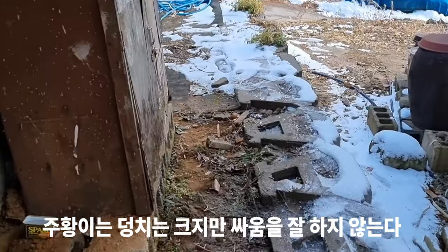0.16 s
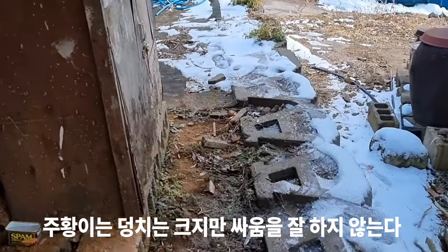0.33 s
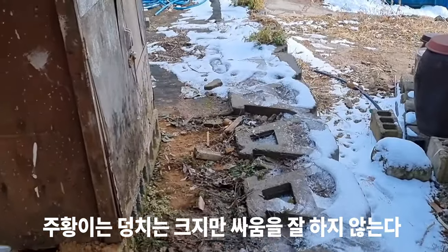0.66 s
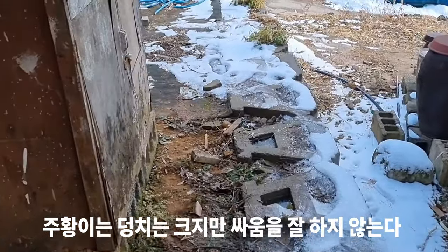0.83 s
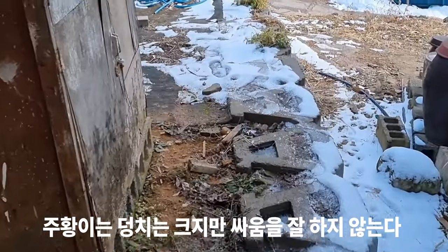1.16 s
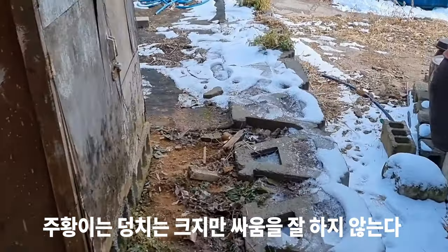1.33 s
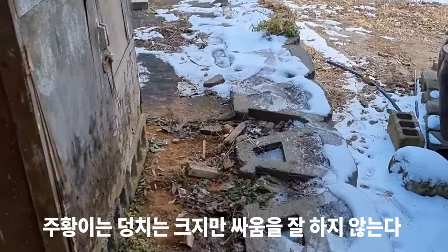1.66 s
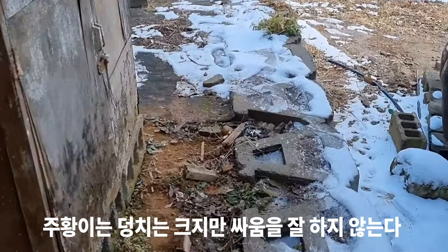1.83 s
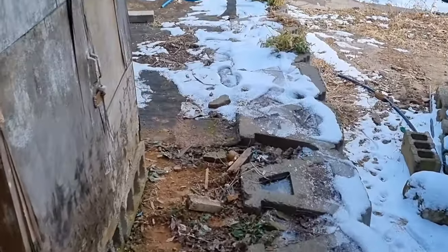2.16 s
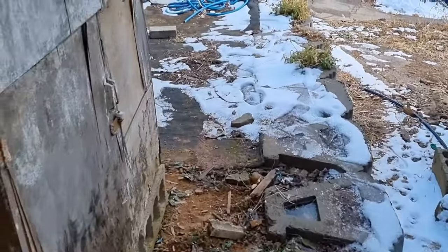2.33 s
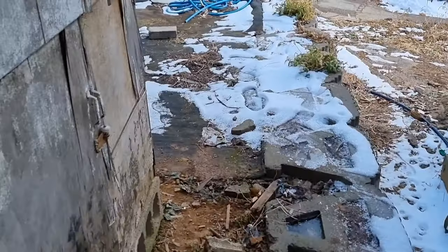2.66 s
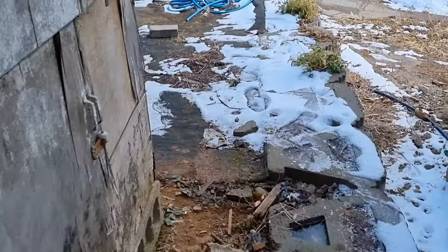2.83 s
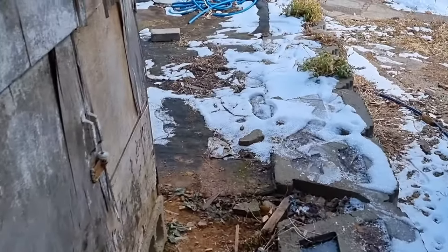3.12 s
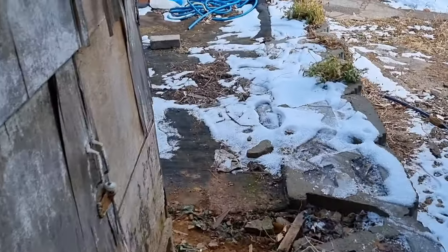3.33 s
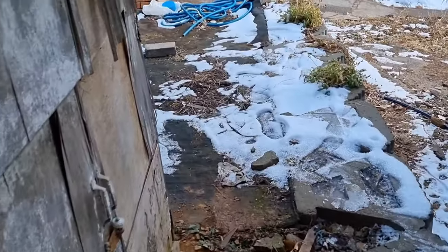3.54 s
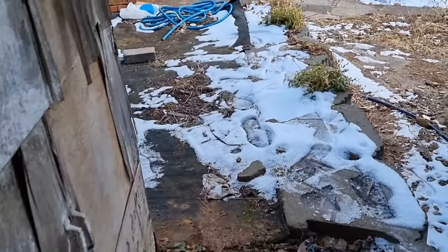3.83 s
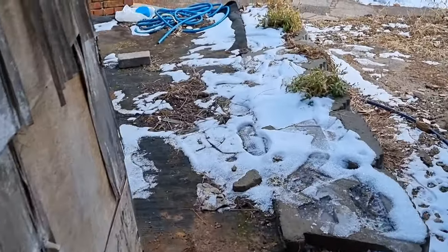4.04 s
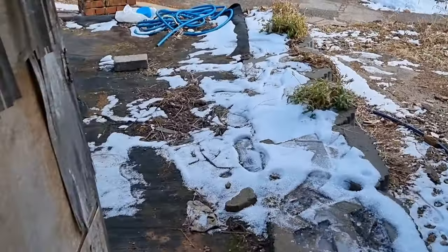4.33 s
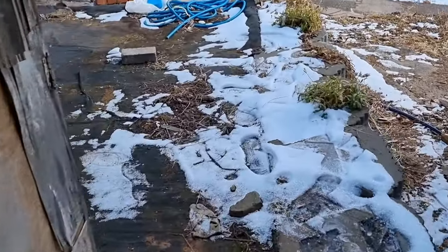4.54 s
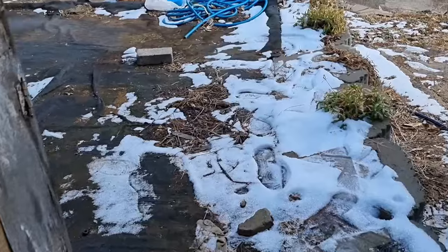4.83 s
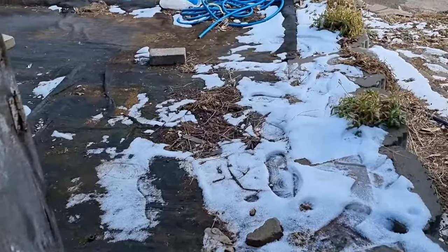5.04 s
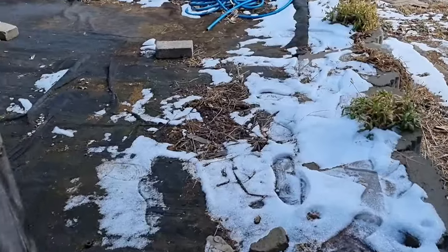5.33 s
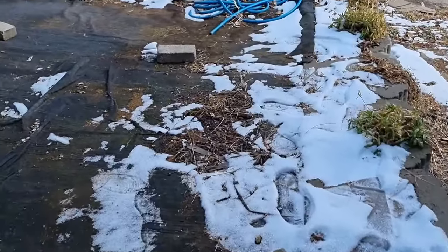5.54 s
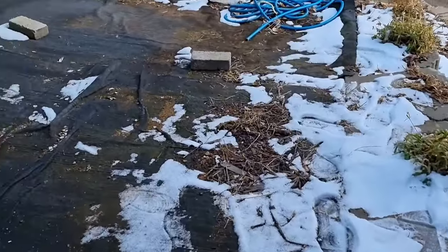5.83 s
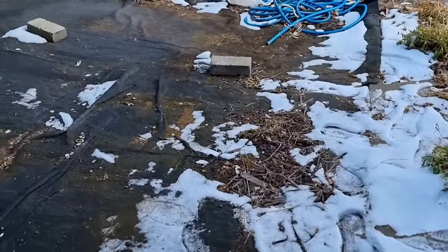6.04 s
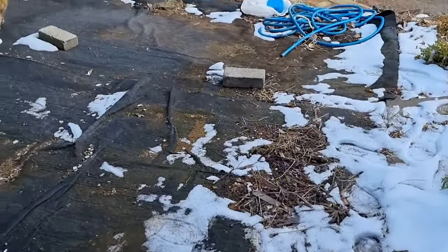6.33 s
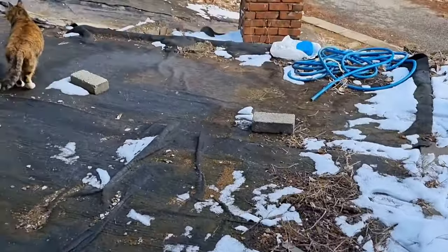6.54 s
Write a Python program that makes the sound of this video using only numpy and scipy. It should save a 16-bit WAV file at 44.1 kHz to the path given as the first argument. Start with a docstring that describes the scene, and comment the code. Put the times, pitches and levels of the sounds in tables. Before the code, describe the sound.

Someone treads carefully on icy ground beside a shed, crust crumbling and snapping in bursts over soft air noise and low rumble.

```python
"""Slow, uneven steps over crusted snow and frozen litter beside a shed, heard by a hand-held phone.
From the start, filtered-noise air and rumble, a two-partial mains hum and a narrow noise drone lie beneath.
Weight crumbles the crust at once: enveloped noise makes grains, damped sines make ringing flakes.
Noise bursts through ground resonances thud; plate resonators crack in snaps, one strong near 1.4 s,
then in clusters near 2.2 s and 4.8 s. A decaying-noise echo follows, and a last thud falls near 6.6 s."""
import sys
import numpy as np
from scipy import signal
from scipy.fft import rfft, irfft, next_fast_len
from scipy.io import wavfile
from scipy.ndimage import uniform_filter1d, map_coordinates

SR = 44100
rng = np.random.default_rng(int(sys.argv[2]) if len(sys.argv) > 2 else 0)


def int16_out(signal):
    """Quantize to a 16-bit WAV file."""
    q = np.round(np.clip(np.atleast_2d(signal).T, -1, 1) * 32767)
    wavfile.write(sys.argv[1], SR, q.astype(np.int16))


N = 294534

# left-right likeness of diffuse air and echo: f/Hz, likeness
AIR_LIKENESS = [(60, 0.57), (240, 0.77), (950, -0.03), (3770, 0.47), (15000, -0.28)]
# loose grains trickling, before layer trims: t/s, crumble level/dB, low rustle level/dB, ice fizz level/dB
TRICKLE_LEVELS = [(0.0, -64.5, -69, -62), (0.43, -51, -73, -60.5), (0.78, -65, -68.5, -66),
                  (1.47, -59.5, -60.5, -63.5), (1.92, -67.5, -69, -69.5), (2.21, -63.5, -66, -67.5),
                  (2.34, -53, -64, -61), (2.64, -63.5, -69, -65), (3.44, -55, -72, -64),
                  (3.64, -66, -66, -71), (4.04, -69.5, -65, -72), (4.58, -61.5, -71, -73),
                  (4.74, -53, -63, -52.5), (5.04, -66, -69, -68), (5.67, -65.5, -62.5, -66),
                  (5.86, -56, -61, -61), (6.12, -70.5, -65.5, -69), (6.68, -68, -82, -66.5)]
# sole meeting hard ground, before layer trims: t/s, hold/s, level/dB, low bump level above it/dB, bump f/Hz
SOLE_THUDS = [(0.037, 0.012, -42, -15, 243), (0.421, 0.0063, -56.5, 3.5, 250),
              (1.187, 0.043, -45.5, -3, 162), (2.181, 0.035, -48.5, -6, 197), (2.235, 0.0071, -42, -2, 208),
              (2.262, 0.0085, -36.5, -0.5, 209), (3.602, 0.0042, -49, 2.5, 416),
              (4.152, .05, -36, -9.5, 290), (5.4, 0.013, -43.5, -2, 218), (5.457, 0.011, -43.5, 3.5, 260),
              (5.481, 0.018, -41.5, -2, 191), (6.637, 0.01, -48, -4.5, 178)]
THUD_RISE_S, THUD_RELEASE_S = 0.0032, 0.052  # release is the time to fall 60 dB
LOOSE_HZ = 1494  # central pitch of loose shards


def amp(db):
    """Logarithmic level: the amplitude ratio of a level in dB."""
    return 10 ** (np.asarray(db) / 20)


def unit(x):
    """Mean-square normalization: scales a signal to rms 1."""
    return x / np.sqrt(np.mean(x ** 2) + 1e-20)


def along(points, hz):
    """Logarithmic frequency scale: interpolates (f/Hz, value) points."""
    f, v = np.transpose(points)
    return np.interp(np.log(hz + 1), np.log(f + 1), v)


def curves(rows):
    """Linear interpolation in time: one value per sample for each column after t/s."""
    s, *cols = np.transpose(rows)
    return [np.interp(np.arange(N) / SR, np.maximum.accumulate(s), c) for c in cols]


def wobble(rate):
    """Slow random modulation: a smooth curve through rate random knots a second."""
    knots = rng.standard_normal(int(N * rate / SR) + 4)
    return map_coordinates(knots, [np.arange(N) * rate / SR])


def filtered(x, response):
    """Linear filtering: the spectrum is multiplied by a complex response of frequency."""
    m = next_fast_len(N + 8192)
    return irfft(rfft(x, m) * response(np.fft.rfftfreq(m, 1 / SR)), m)[..., :N]


def causal(points):
    """Minimum phase by cepstral folding: a response of (f/Hz, level/dB) points, with energy 1."""
    def response(hz):
        ceps = irfft(np.log(amp(np.maximum(along(points, hz), -70))))
        half = len(ceps) // 2
        ceps[1:half] *= 2
        ceps[half + 1:] = 0
        gain = np.exp(rfft(ceps))
        return gain / np.sqrt(np.mean(abs(gain) ** 2))
    return response


def resonances(modes, hz):
    """Modal superposition: damped (f/Hz, width/Hz, level/dB) modes of alternating sign, with energy 1."""
    gain = 0
    for k, (center, width, db) in enumerate(modes):
        damping = 1j * hz * width
        gain = gain + (-1) ** k * amp(db) * damping / (center * center - hz * hz + damping)
    return gain / np.sqrt(np.mean(abs(gain) ** 2))


def ports(pair, alike):
    """Spatial coherence: mixes two unrelated signals into left and right with the given likeness."""
    def mid_side_gains(hz):
        turn = np.arccos(np.clip(along(alike, hz), -1, 1)) / 2
        return np.sqrt(2) * np.array([np.cos(turn), np.sin(turn)])
    mid, side = filtered(pair, mid_side_gains)
    return np.array([mid + side, mid - side]) / np.sqrt(2)


def yard():
    """Stationary noise and mains harmonics: faint broad air, low rumble, and a hum that wavers."""
    # relative air spectrum: f/Hz, level/dB
    air_colour = [(47, -35), (80, 4.5), (91, -16), (217, -10), (259, -15.5), (316, -14.5), (413, -15.5),
                  (601, -12.5), (858, -17), (1200, -18), (5050, -33.5), (7050, -23.5), (11000, -32.5),
                  (12800, -22.5), (16000, -33.5)]
    # relative rumble spectrum: f/Hz, level/dB
    rumble_colour = [(15, -6.5), (28, -6), (45, -8.5), (90, -17), (140, -38.5)]
    # hum envelope, before its 3 dB lift and waver: t/s, level/dB
    hum_levels = [(0, -61.5), (2.3, -63.5), (4.4, -66), (4.7, -72.5), (6.2, -70), (6.68, -91)]
    air = filtered(rng.standard_normal((2, N)), lambda hz: amp(along(air_colour, hz)))
    air = amp(-66.5 + 1.2 * wobble(3.41)) * unit(ports(air, AIR_LIKENESS))
    rumble = filtered(rng.standard_normal((2, N)), lambda hz: amp(along(rumble_colour, hz)))
    rumble = amp(-70.5) * unit(ports(rumble, AIR_LIKENESS))
    phase = 2 * np.pi * 59.8 * np.arange(N) / SR + .9 * wobble(11)
    waver_db = 2.6 * wobble(14) + 1.5 * wobble(4)
    partials = np.sin(phase) + amp(-15.5) * np.sin(2 * phase)
    hum = amp(curves(hum_levels)[0] + 3.0 + waver_db) * partials
    return air + rumble + hum


def drone():
    """Narrow-band noise: a twice-applied resonance wavers alike at both ports and lingers after some steps."""
    # drone envelope: t/s, level/dB
    drone_levels = [(0.0, -78), (0.5, -73), (1.15, -84), (1.39, -72), (2.08, -82), (2.36, -68),
                    (2.66, -78.5), (3.44, -69.5), (4.54, -81), (4.72, -71), (5.15, -80), (5.62, -63.5),
                    (6.34, -80.5), (6.68, -81)]
    center_hz, width_hz = 314, 25  # width of one pass
    mode = [(center_hz, width_hz, 0)]
    band = filtered(rng.standard_normal(N), lambda hz: resonances(mode, hz) ** 2)
    return amp(curves(drone_levels)[0]) * unit(band)


def press(start, rise, hold, release):
    """Contact-force envelope: a rounded rise, a hold, then an exponential release."""
    t = np.arange(N) / SR - start
    rise = max(rise, .001)
    up = np.sin(np.pi / 2 * np.clip(t / rise, 0, 1)) ** 2
    return up * amp(-60 * np.maximum(t - rise - max(hold, 0), 0) / release)


def pushes():
    """Addition of powers: trickle, pushes and thuds drive each layer; power weights the shard pitch."""
    # weight crushing the crust, before layer trims: t/s, rise/s, hold/s, crumble level/dB,
    # thud level above it/dB, fizz level above it/dB, shard f/Hz
    push_rows = [(0, 0.028, 0.033, -35, -7, -5, 1800), (0.26, 0.026, 0.033, -53, -8, -1.5, 1400),
                 (0.396, 0.0035, 0.018, -44, -3, -11, 1280), (0.434, .015, 0.027, -64, -20, 2, 1410),
                 (0.832, 0.026, 0.026, -45.5, -25, -7, 1840), (1.185, 0.0067, 0.05, -41, -2, -4, 1600),
                 (1.253, 0.0092, 0.045, -42, -11.5, -6, 1700), (1.322, .012, 0.017, -49, -25, 0.5, 1610),
                 (2.174, 0.0033, 0.013, -32.5, -5.5, -1, 2000), (2.201, 0.023, 0.05, -31, -12, -9.5, 1960),
                 (2.28, .005, 0.026, -43, -7, -5, 1510), (2.38, 0.0062, 0.005, -33, -16, -10.5, 1170),
                 (2.467, .004, 0.042, -46.5, -10, -5.5, 1330), (2.522, .01, .04, -61, -15, 2.5, 2040),
                 (2.931, 0.035, 0.051, -50.5, -28, -4, 1870), (3.29, 0.029, 0.04, -54, 1, -1.5, 1220),
                 (3.409, 0.0087, 0.0075, -46.5, -4.5, -2, 2020), (3.459, 0.025, 0.089, -54, -23, 6, 2260),
                 (4.153, 0.0048, 0.042, -32, -6, -2, 1580), (4.528, 0.017, 0.029, -44.5, -31, -17, 1770),
                 (4.573, 0.0096, 0.074, -46, -20, -15, 1770), (4.673, 0.0064, 0.004, -34.5, -19, -22, 1640),
                 (4.704, .01, 0.016, -39, -20, -17, 1570), (4.746, 0.0086, 0.038, -35, -18, -12.5, 1620),
                 (4.807, 0.0046, 0.017, -44.5, -18, -12, 1440), (4.855, 0.026, 0.059, -51, -18, -5, 2090),
                 (5.367, .03, 0.083, -50.5, -14, 3, 1560), (5.425, 0.009, .05, -43, -15, 0, 2200),
                 (5.495, .01, 0.029, -64.5, -7, 15.5, 2000)]
    release_s = 0.099  # 60 dB fall once the weight stops moving
    drift = 0.26  # slow pitch drift of loose shards, in log units
    power = amp(curves(TRICKLE_LEVELS)) ** 2
    pitch = power[0] * (np.log(LOOSE_HZ) + drift * wobble(7))
    for s, rise, hold, db, thud_db, fizz_db, hz in push_rows:
        weight = (amp(db) * press(s, rise, hold, release_s)) ** 2
        power = power + weight * amp([[0], [thud_db], [fizz_db]]) ** 2
        pitch = pitch + weight * np.log(hz)
    thuds = 0
    for s, hold, db, *_ in SOLE_THUDS:
        thuds = thuds + (amp(db) * press(s, THUD_RISE_S, hold, THUD_RELEASE_S)) ** 2
    crust, thud, fizz = np.sqrt(power[0]), np.sqrt(power[1] + thuds), np.sqrt(power[2])
    return crust, thud, fizz, np.exp(pitch / power[0])


def grains(rate, spread_db, life_ms, bed):
    """Shot noise: two noises share an envelope of tiny decaying breaks at random moments, over a bed."""
    breaks = (rng.random(N) < rate / SR) * amp(spread_db * rng.exponential(size=N))
    fade = np.exp(-1000 / (life_ms * SR))
    envelope = unit(signal.lfilter([1], [1, -fade], breaks)) + bed
    return unit(envelope * rng.standard_normal((2, N)))


def shards(force, pitch, rate, spread, cycles):
    """Damped free vibration: each flake is a short ring near the shard pitch, of unrelated phases in two signals."""
    count = 4000
    draw = rng.random((count, 4))
    start = (np.cumsum(-np.log(draw[:, 0])) * SR / rate).astype(int) % N
    hz = pitch[start] * np.exp(spread * rng.standard_normal(count))
    size = force[start] * amp(2.67 * -np.log(draw[:, 1]))
    steps = np.arange(300)  # samples in one ring
    turns = np.outer(hz / SR, steps)
    fade = size[:, None] * np.exp(-turns / cycles) * np.sqrt(hz / 1500)[:, None]
    at = (start[:, None] + steps).ravel()

    def ring(phase):
        waves = fade * np.sin(2 * np.pi * (turns + phase[:, None]))
        return np.bincount(at, waves.ravel(), N + steps.size)[:N]

    return np.array([ring(draw[:, 2]), ring(draw[:, 3])])


def sounded(crust, thud, fizz):
    """Source-filter principle: forces on crust, ground and ice dust each pass through their own colour."""
    # relative crust spectrum: f/Hz, level/dB
    crust_colour = [(200, -18.5), (350, -18.5), (500, -6.5), (800, -3.5), (1500, -2.5), (2100, -3.5),
                    (2900, -4), (3400, -5.5), (3750, -20), (5000, -18.5), (7000, -51)]
    # relative ice-dust spectrum: f/Hz, level/dB
    ice_colour = [(2060, -40), (3500, -3.5), (4660, -6), (5360, -4), (6610, -4.5), (7560, -1.5),
                  (9560, -10), (11100, -8.5), (12600, -6.5), (14200, -6.5), (16000, -6)]
    # sole on frozen soil: f/Hz, width/Hz, relative level/dB
    ground_modes = [(181.5, 134, -11), (306.4, 65, 2), (418, 82, -0.5), (660, 315, -7)]
    # left-right likeness of the steps: f/Hz, likeness
    step_likeness = [(150, 0.97), (500, 0.65), (1500, 0.7), (5000, 0.058), (14000, 0.043)]
    both = filtered(crust, causal(crust_colour)) + filtered(fizz, causal(ice_colour))
    both += filtered(thud, lambda hz: resonances(ground_modes, hz))
    return ports(both, step_likeness)


def crumble():
    """Granular fracture: dense grains and ringing flakes break while weight rolls over the sole."""
    crust, thud, fizz, pitch = pushes()
    clumps = wobble(60)  # grains come in clumps that all layers share
    crust = crust * amp(1.5 * clumps)
    crust_grains = amp(-5) * crust * grains(400, spread_db=2.2, life_ms=3.2, bed=.7)
    flakes = amp(-11) * shards(crust, pitch, 600, spread=0.335, cycles=2.74)
    fizz = fizz * amp(0.32 * clumps) * grains(650, spread_db=4.0, life_ms=4.7, bed=1.0)
    thud = thud * amp(1.05 * clumps - 4.5) * grains(150, spread_db=1.5, life_ms=1.4, bed=1.3)
    return sounded(crust_grains + flakes, thud, fizz)


def bumps():
    """Resonant impact: one broad mode gives the heel's low bump under each thud, alike at both ports."""
    out = np.zeros(N)
    for s, hold, db, bump_db, hz in SOLE_THUDS:
        b, a = signal.iirpeak(hz, 1.6, SR)
        once = signal.lfilter(b, a, rng.standard_normal(N))
        body = unit(signal.lfilter(b, a, once))
        out += amp(db + bump_db) * press(s, THUD_RISE_S, hold, THUD_RELEASE_S) * body
    return out


def faint(count):
    """Random point process: rows of small snaps at random moments whose levels follow the trickle."""
    least_db, spread_db = 5.5, 4  # least rise over the trickle, mean further rise
    draw = rng.random((count, 3))
    times = .02 + draw[:, 0] * (N / SR - .02)
    trickle_db = curves(TRICKLE_LEVELS)[0][(times * SR).astype(int)]
    levels = trickle_db + least_db - spread_db * np.log(draw[:, 1])
    pitches = LOOSE_HZ * np.exp(2.9 * (draw[:, 2] - .5))
    return [(s, db, -22, -15, hz, 1.2, .04) for s, db, hz in zip(times, levels, pitches)]


def snaps():
    """Brittle fracture: a snap swells, breaks and rattles in splinters that excite two plate modes."""
    # single snaps, before colouring and layer trims: t/s, peak level/dB, thud level above it/dB,
    # fizz level above it/dB, plate f/Hz, rise/ms, time to fall 60 dB/s
    snap_rows = [(0.075, -29.5, -17, -25, 993, 1.1, 0.1), (0.212, -27.5, -22, -30, 1300, 0.91, 0.088),
                 (0.219, -26.5, -25.5, -26, 1400, 1.18, 0.096), (0.322, -40, -15, -26, 1000, 0.81, 0.094),
                 (0.358, -32.5, -22, -16, 1550, 1.8, 0.15), (0.401, -20, -24, -32, 1200, 0.81, 0.08),
                 (0.419, -36, -27, -14, 730, 1.5, 0.075), (0.448, -41.5, -27, -8.5, 623, 1.6, 0.11),
                 (0.485, -26, -23, -20, 1540, 0.86, 0.055), (0.6, -28.5, -8.5, -19.5, 1900, 1.26, 0.055),
                 (0.668, -34, -12.5, -16.5, 2100, 1.45, 0.067), (0.731, -47.5, -18, -8.5, 1310, 1.4, 0.048),
                 (0.833, -32.5, -18.5, -24, 2110, 1.2, 0.038), (0.855, -27.5, -22, -16.5, 1570, 1.8, 0.043),
                 (0.909, -29, -31, -22.5, 1350, 1.15, 0.052), (0.982, -40.5, -18, -14, 1700, 0.85, 0.066),
                 (0.994, -24, -16, -21.5, 1690, 1.35, 0.081), (1.187, -29, -21, -25, 575, 1.46, 0.097),
                 (1.327, -36, -27, -17, 1050, 1.5, 0.065), (1.342, -29.5, -29, -25, 1700, 1.15, 0.055),
                 (1.402, -13, -34, -36.5, 1150, 0.98, 0.041), (1.478, -41, -17, -29, 619, 1.2, 0.046),
                 (1.538, -41, -16, -13, 1880, 0.95, 0.12), (1.566, -39, -26, -18, 970, 1.15, 0.073),
                 (1.612, -45.5, -18, -8.5, 1340, 1.2, 0.11), (1.633, -37, -26, -23, 960, 1.1, 0.097),
                 (1.679, -39.5, -24, -18, 1000, 1.1, 0.055), (1.767, -44.5, -16, -15, 945, 0.74, 0.097),
                 (1.792, -40.5, -12, -22, 813, 1.2, 0.1), (1.811, -32, -23.5, -15, 1050, 1, 0.15),
                 (2.044, -45.5, -25, -21, 3120, 1.15, 0.061), (2.177, -21, -24.5, -18, 2070, 0.93, 0.071),
                 (2.224, -15.5, -30, -25, 2800, 0.87, 0.083), (2.242, -17, -21, -28, 1520, 0.97, 0.047),
                 (2.271, -21, -11.5, -17.5, 1660, 1.04, 0.047), (2.311, -23, -26, -33, 1470, 0.9, 0.061),
                 (2.365, -24.5, -28, -31, 1450, 0.75, 0.066), (2.387, -23, -22, -38, 800, 0.68, 0.065),
                 (2.473, -28, -14.5, -25, 890, 1.2, 0.047), (2.488, -26.5, -27, -26, 1230, 1, 0.085),
                 (2.528, -34, -40, -17, 2600, 1.9, 0.071), (2.672, -43.5, -17, -14.5, 1940, 1.6, 0.055),
                 (2.773, -54, -17, 0.5, 1340, 0.99, 0.17), (2.825, -40.5, -16, -10.5, 1530, 0.94, 0.17),
                 (2.85, -16.5, -16, -22, 1140, 1.68, 0.057), (2.948, -28, -22.5, -23, 1330, 0.86, 0.039),
                 (2.988, -47, -29, -24, 1820, 1.15, 0.064), (3.064, -41.5, -20, -13, 1320, 0.8, 0.043),
                 (3.108, -40, -24, -35, 942, 1.24, 0.036), (3.162, -25, -10.5, -19, 2340, 1.45, 0.1),
                 (3.23, -21.5, -14, -24, 1620, 1.14, 0.077), (3.285, -35.5, -17, -16.5, 700, 1.4, 0.075),
                 (3.316, -42, -2.5, -19, 708, 1.3, 0.055), (3.361, -38.5, -14, -11.5, 2830, 1.3, 0.089),
                 (3.396, -36.5, -35, -13, 2160, 1.2, 0.055), (3.42, -33.5, -12.5, -8, 2490, 1.15, 0.07),
                 (3.481, -40, -13.5, -14, 2820, 1, 0.083), (3.509, -41, -21, -13, 1980, 1.15, 0.055),
                 (3.526, -38, -29, -19, 1510, 1, 0.087), (3.56, -37.5, -26, -6.5, 2540, 1.4, 0.077),
                 (3.606, -36.5, -21, -30, 614, 0.95, 0.12), (4.161, -20.5, -12.5, -9, 2460, 0.91, 0.11),
                 (4.188, -19, -14.5, -21, 670, 0.7, 0.046), (4.32, -35.5, -24, -24.5, 1116, 1.2, 0.13),
                 (4.347, -37.5, -31, -22, 2750, 1, 0.051), (4.362, -29.5, -44, -21.5, 1700, 0.9, 0.077),
                 (4.385, -40, -33, -17, 2910, 1.1, 0.063), (4.427, -29.5, -37, -34, 1700, 0.66, 0.026),
                 (4.538, -31, -30, -33, 1640, 0.86, 0.045), (4.549, -23, -40, -33.5, 1700, 1.1, 0.065),
                 (4.583, -26.5, -33, -21, 1710, 1.1, 0.089), (4.618, -24, -31, -23.5, 1870, 0.81, 0.06),
                 (4.625, -27, -33, -22.5, 1850, 1.2, 0.051), (4.651, -35, -14, -22, 1050, 1.2, 0.03),
                 (4.684, -18.5, -26.5, -21.5, 1140, 1.6, 0.03), (4.711, -26, -38, -18, 1840, 0.79, 0.081),
                 (4.737, -28.5, -25, -19, 2680, 1.15, 0.046), (4.754, -19, -32, -26, 1590, 0.99, 0.055),
                 (4.775, -29, -23, -30, 1090, 0.61, 0.047), (4.789, -22, -22, -28, 1850, 0.8, 0.031),
                 (4.821, -22, -30, -27, 980, 0.88, 0.038), (4.867, -33, -22, -15, 2720, 1, 0.055),
                 (4.893, -38, -34, -13, 2010, 1.15, 0.051), (4.918, -39.5, -26, -5.5, 2710, 1.15, 0.046),
                 (4.928, -31.5, -34, -18, 2640, 1.5, 0.046), (4.967, -37.5, -30, -29, 869, 0.82, 0.048),
                 (4.984, -39.5, -22, -16, 2670, 1.15, 0.032), (5.031, -37.5, -38, -23, 2620, 0.6, 0.076),
                 (5.077, -45.5, -14, -5, 2500, 1.15, 0.076), (5.201, -31.5, -20, -18, 860, 1.7, 0.035),
                 (5.225, -34.5, -32, -17, 848, 1.34, 0.048), (5.238, -24, -39, -26, 2430, 1.13, 0.041),
                 (5.253, -35.5, -23, -9.5, 894, 1.3, 0.042), (5.272, -26, -26.5, -22, 850, 0.91, 0.061),
                 (5.367, -40, -14, -6, 1070, 1.3, 0.055), (5.383, -39, -22, -4, 875, 1.3, 0.036),
                 (5.402, -31.5, -13, -21, 1110, 1.4, 0.046), (5.43, -32, -19, -15, 810, 1.15, 0.078),
                 (5.449, -20.5, -20, -14, 2300, 1.18, 0.1), (5.65, -23, -8, -0.5, 2200, 1.19, 0.018),
                 (5.688, -31.5, -21, -14.5, 1410, 1.25, 0.048), (5.751, -14, -24, -18, 1400, 0.86, 0.028),
                 (5.819, -31, -31, -15, 2020, 0.69, 0.039), (5.879, -34.5, -17.5, -11.5, 1010, 0.78, 0.071),
                 (5.919, -39.5, -26, -15.5, 2180, 1.23, 0.069), (5.993, -37.5, -23, -14, 2370, 1.3, 0.055)]
    crust, thud, fizz = np.zeros((3, 2, N + SR))
    lean = np.zeros(N + SR)
    t = np.arange(SR // 8) / SR - .006
    after = np.maximum(t, 0)
    for s, db, thud_db, fizz_db, hz, rise_ms, t60 in snap_rows + faint(count=40):
        noise = rng.standard_normal((3, 2, len(t)))
        # the rattle comes in lumps
        lumps = map_coordinates(rng.standard_normal(size=64), [after * 400], order=1)
        splinters = amp(5.18 * lumps) * amp(-60 * after / np.clip(t60, .01, .3))
        swell = np.exp(np.minimum(t - .001, 0) * 1000 / np.clip(rise_ms, .1, 4))
        shape = swell * (amp(-60 * after / 0.0058) + 0.67 * splinters)
        # the break itself is one hard edge
        noise[:, 0, np.argmax(shape)] = np.array([8, 25, 8]) / np.clip(rise_ms, .5, 4)
        blow = noise[0] * shape
        b, a = signal.iirpeak(min(hz, 8000), 4.5, SR)
        plate = 0.38 * blow + 2.0 * signal.lfilter(b, a, blow)
        # the plate's second mode is driven only near the break
        b, a = signal.iirpeak(min(1.59 * hz, 9000), 3.5, SR)
        plate += 0.88 * signal.lfilter(b, a, blow * amp(-60 * after / 0.011))
        first = round((s + t[0]) * SR)
        at = slice(first, first + len(t))
        crust[:, at] += amp(db) * plate / abs(plate).max()
        thud[:, at] += amp(db + thud_db - 3.5) * swell * amp(-60 * after / 0.054) * noise[1]
        fizz[:, at] += amp(db + fizz_db + 1.5) * shape ** 0.74 * noise[2]  # ice dust falls for longer
        lean[at] = 2.5 * rng.standard_normal() - .5  # left-right dB
    lean = uniform_filter1d(lean, size=64)[:N]  # where along the sole the break happens
    return sounded(crust[:, :N], thud[:, :N], fizz[:, :N]) * amp([lean / 2, -lean / 2])


def shed(x):
    """Reverberant decay: wall and ground answer as noise whose frequencies die at their own speeds."""
    # echo decay: f/Hz, time to fall 60 dB/s
    decay_times = [(200, 0.18), (1500, 0.088), (10000, 0.092)]
    hz, t, z = signal.stft(rng.standard_normal((2, SR // 2)), SR, nperseg=256)
    decay = amp(-60 * t / along(decay_times, hz)[:, None])
    tail = signal.istft(z * decay, SR, nperseg=256)[1]
    heard = np.pad(x.mean(axis=0), (250, 0))[None]  # the answer comes 250 samples late
    echo = signal.fftconvolve(heard, tail / np.linalg.norm(tail[0]), axes=1)[:, :N]
    return ports(echo, AIR_LIKENESS)


def scene():
    """Superposition and arrival-time difference: steps with a lagging left port, echo, drone and yard."""
    # the feet are nearer the right port: t/s, left lag/ms
    left_lag = [(0, 0.21), (.6, 0.061), (3.2, 0.058), (4.3, 0.13), (4.9, 0.036), (6.68, 0.068)]
    steps = crumble() + snaps() + bumps()
    late = np.arange(N) - curves(left_lag)[0] * SR / 1000
    steps[0] = map_coordinates(steps[0], [late])
    return steps + amp(-10) * shed(steps) + drone() + yard()


def record(dry):
    """Interchannel level and phase difference: the ports differ in colour and phase below a band limit."""
    # port colour: f/Hz, left-right level difference/dB
    port_levels = [(60, 2.5), (110, -1.5), (200, 1.5), (380, 0.5), (700, -1), (1290, -3.5), (2380, -4),
                   (4400, 3.5), (8120, -0.5), (15000, -2.5)]
    # the port cavities ring at unlike pitches: f/Hz, left phase lead/rad
    port_leads = [(500, 0.19), (800, -0.08), (1380, -1.11), (1900, -0.058), (2500, -0.27), (3300, -0.53)]
    top_hz = 15900

    def half(points, hz):
        return np.outer([.5, -.5], along(points, hz))

    def response(hz):
        return amp(half(port_levels, hz)) * np.exp(1j * half(port_leads, hz)) * (hz < top_hz)

    return filtered(dry, response)


dry = scene()
out = record(dry)
int16_out(out)
```